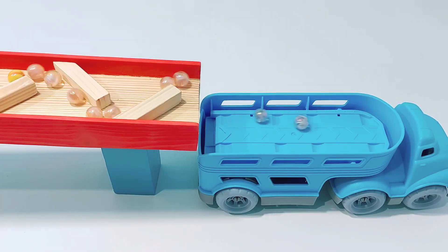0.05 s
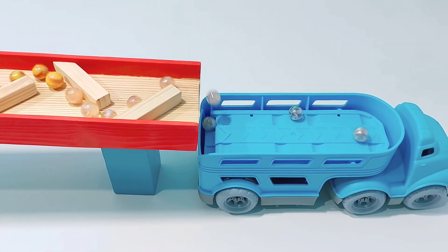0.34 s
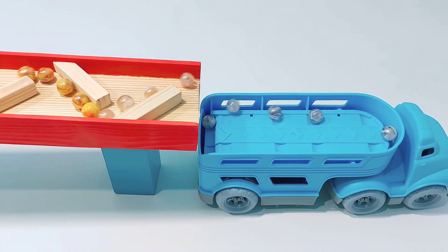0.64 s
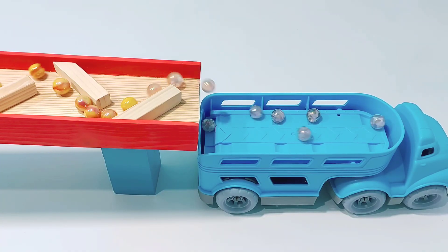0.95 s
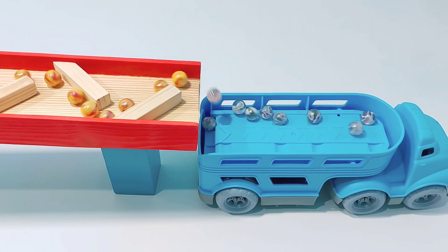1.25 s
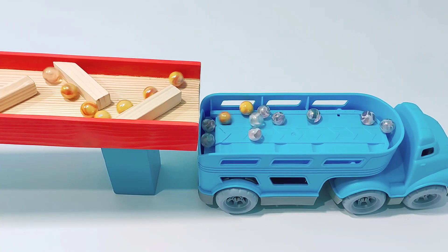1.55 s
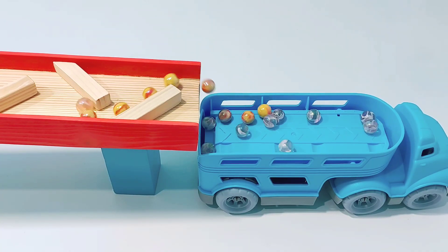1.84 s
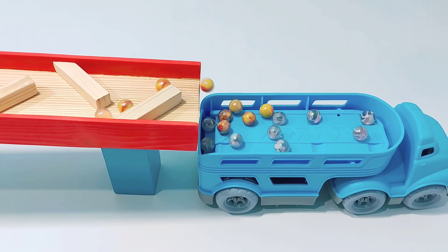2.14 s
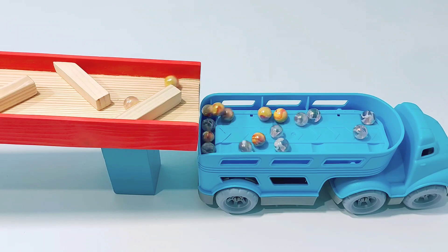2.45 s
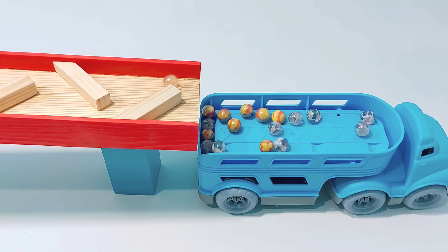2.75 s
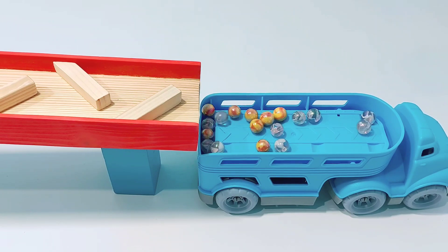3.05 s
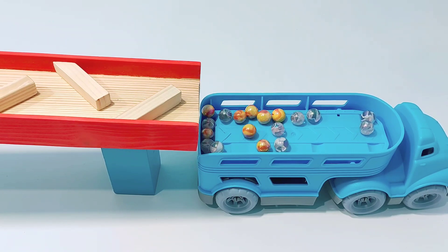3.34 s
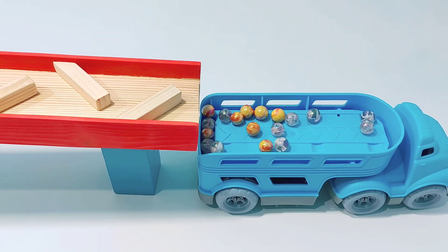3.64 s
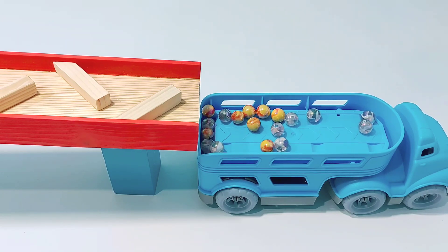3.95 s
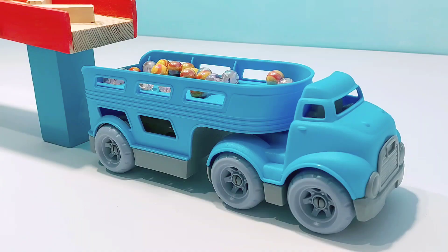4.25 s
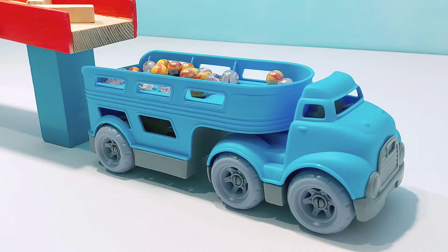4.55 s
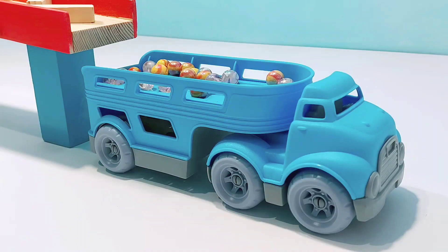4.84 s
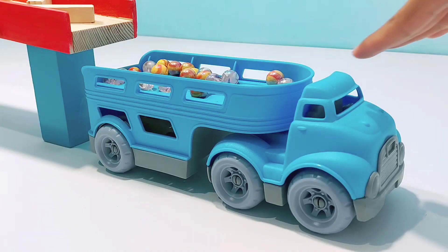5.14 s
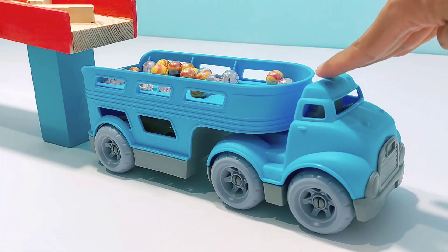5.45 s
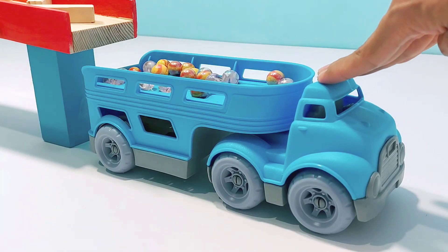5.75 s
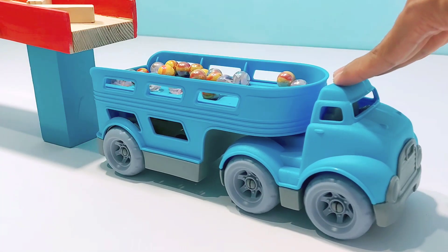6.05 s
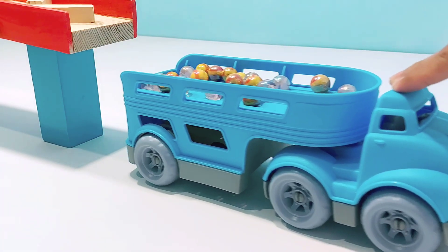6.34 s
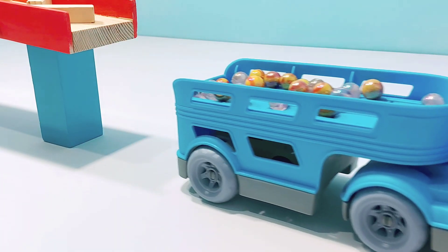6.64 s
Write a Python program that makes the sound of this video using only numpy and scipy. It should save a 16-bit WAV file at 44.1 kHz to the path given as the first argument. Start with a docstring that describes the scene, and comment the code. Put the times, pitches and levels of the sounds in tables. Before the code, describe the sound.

Glass marbles roll down a wooden track, knocking against its blocks and dropping one by one into the bed of a plastic toy truck, where they bounce, click together and settle. A lull follows with a faint, deep rumble. Then the truck is pushed across the table, its hollow shell drumming and the marbles rattling inside. The microphone is close, in a small, live room with faint hiss.

```python
"""A small, live room, with a stereo microphone close to the toys on a table. Glass marbles roll down a
wooden track, knock against its blocks and drop one by one into the bed of a plastic toy truck, a little
to the right, where they bounce, click together and settle. After a lull with a low rumble, the truck is
pushed over the table: its hollow shell drums and the load rattles. Room tone and faint hiss lie behind."""
import sys
import numpy as np
from scipy import signal
from scipy.fft import rfft, irfft, next_fast_len
from scipy.io import wavfile
from scipy.ndimage import uniform_filter1d

SR = 44100
rng = np.random.default_rng(int(sys.argv[2]) if len(sys.argv) > 2 else 0)


def wav_out(sig):
    """Save sig, one row per channel (or a flat mono array), as 16-bit PCM at SR to the path in sys.argv[1]."""
    wavfile.write(sys.argv[1], SR, np.round(np.clip(np.atleast_2d(sig).T, -1, 1) * 32767).astype(np.int16))


N = 304731
TIME = np.arange(N) / SR
BLOW_TIME = TIME[:8192]

# spectra of the background and the room's reflections: (frequency [Hz], relative level [dB])
ROOM_TONE_COLOUR = [(12, -52), (20, -24), (55, 7), (119, 3), (354, -7), (401, -1.5), (505, -13.5),
                    (768, -15), (927, -20.5), (3000, -44.5), (3900, -75), (6600, -120)]
HISS_COLOUR = [(530, -33.5), (900, -3.5), (1930, -4), (3140, -8.5), (4440, -7.5), (5840, -11.5),
               (9740, -6.5), (15500, -11)]
RUMBLE_COLOUR = [(12, -52), (20, -34), (30, -20), (38, -2), (49, -7.5), (64, 4), (129, -5.5), (151, -11.5),
                 (236, -10.5), (429, -38.5), (670, -39.5), (1200, -44), (1560, -76), (2640, -120)]
ROOM_COLOUR = [(100, 0.5), (250, -0.5), (430, -1), (800, -0.5), (2500, -0.5), (5000, -1), (11000, 3),
               (15000, -2)]
WHITE = [(20, 0), (20000, 0)]
# reverberation of the room: (frequency [Hz], time to fall 60 dB [s])
ROOM_T60 = [(100, 1), (300, 0.75), (1500, 0.4), (4500, 0.32), (12000, 0.22)]
# likeness of the microphone's two channels: (frequency [Hz], correlation [0-1])
LIKENESS = [(60, .975), (250, .955), (500, .92), (1000, .25), (2000, .4), (4000, .17), (9000, 0)]

# spectra of the rolling sounds and the blows: (frequency [Hz], relative level [dB])
TRUCK_COLOUR = [(35, -53), (60, -30), (90, -20), (180, -7), (290, 0), (500, -21.5), (850, -4.5),
                (1400, -14), (2200, -19), (3000, -27), (4400, -23), (6000, -38.5), (11500, -31),
                (15000, -44)]
JOLT_COLOUR = [(50, -11), (130, -27.5), (270, 0), (380, -14.5), (550, -53), (2000, -56)]
ROLL_COLOUR = [(24, -46.5), (40, -4.5), (298, 3), (392, 5.5), (514, -9), (1230, 0.5), (1390, -2.5),
               (1490, -1), (1650, -13), (2450, -1.5), (2990, -9.5), (4130, -16.5), (5990, -33),
               (11700, -32.5), (15000, -33)]
CLICK_COLOUR = [(1000, -31), (3500, -20.5), (5000, -3.5), (6800, -0.5), (9000, -0.5), (11300, 3.5),
                (13000, -3), (15500, -15.5)]
KNOCK_COLOUR = [(100, -11.5), (250, -6.5), (600, 2.5), (1300, 3.5), (2300, -3), (4300, -7), (5500, -14),
                (15000, -22)]
DROP_COLOUR = [(41, -54.5), (70, -30), (237, 0.5), (489, -11), (599, -5), (734, -19), (941, -16.5),
               (1230, -9), (1900, -7.5), (2430, -9), (3410, -13), (4280, -16), (6280, -19), (11300, -12.5),
               (15500, -23.5)]
SNAP_COLOUR = [(500, -5), (1500, -0.5), (2500, -16), (4300, 2), (5500, -12.5), (8000, -18), (11500, -4),
               (15500, -8.5)]
# resonances of the moving truck: (frequency [Hz], width [Hz], lift [dB])
TRUCK_PEAKS = [(135, 21, 17), (197, 37, 10), (285, 58, 3), (345, 74, -5.5), (1160, 70, -1.5),
               (1368, 94, 10.5), (1900, 69, 6)]
# resonances of track and bed under a rolling marble: (frequency [Hz], width [Hz], lift [dB])
ROLL_PEAKS = [(125, 31.1, 9), (210, 15, 12), (275, 23, 12), (350, 54, 4.5), (420.5, 23, 3), (587, 30, -5),
              (789.4, 61, 9.5), (1051, 50, 0), (1230, 44, 2), (1565, 52, 10), (2100, 65, 4.5),
              (2332, 130, -4)]
# modes of the wooden track and of the loaded truck bed: (frequency [Hz], relative level [dB])
WOOD_MODES = [(350, -7.5), (790, -7), (1075, -4.5), (1295, -5.5), (1500, 4), (1740, -3), (2030, -0.5),
              (2280, -1.5), (2440, -8), (3300, -12.5), (3700, -17.5)]
BED_MODES = [(130, -4), (222, 0.5), (280, -2), (408, -1.5), (552, -9.5), (587, -7), (625, -6.5),
             (785, -6.5), (1258, 2.5), (1400, -9.5), (1460, 2), (1555, 0), (1780, -17), (2205, 1.5),
             (2420, -0.5), (2550, -1), (2820, 0), (3510, -11), (4010, 0.5), (4190, -3), (4410, -6),
             (5040, -9.5)]

# swells of deep rumble while the truck stands: (time [s], length [s], level [dB])
SWELLS = [(4.323, 0.47, -39), (4.951, .39, -37.5), (5.375, 0.4, -42)]
# the truck's shell jolted on its wheels: (time [s], relative level [dB])
JOLTS = [(6.223, -9), (6.472, -4.5), (6.509, -7.5), (6.575, -6.5), (6.652, 1), (6.698, -4.5), (6.744, -6.5),
         (6.881, -10.5)]
# marbles striking the wooden blocks: (time [s], relative level [dB])
BLOCK_HITS = [(0.211, -14), (0.371, -15), (0.413, -7.5), (0.577, -11), (0.81, -13), (0.85, -7.5),
              (1.014, -12), (1.596, -13), (1.761, -18), (1.897, -13.5), (2.786, -35)]
# one marble running into another: (time [s], relative level [dB])
CLICKS = [(0.398, -20), (0.5353, -21), (0.6266, -24), (0.795, -19.5), (0.8738, -16), (1.011, -16),
          (1.026, -20), (1.4105, -18), (1.616, -17.5), (2.208, -20.5), (2.241, -18), (2.4262, -12.5),
          (2.512, -24.5), (2.7043, -27), (3.016, -19), (3.077, -24.5), (3.1062, -29), (3.1476, -27.5),
          (3.29, -33.5), (3.4988, -43), (3.6498, -52), (5.9547, -35), (6.074, -36.5), (6.2619, -18.5),
          (6.3205, -17.5), (6.4162, -29), (6.621, -15), (6.6548, -19), (6.833, -29.5)]
# bumps on the truck's floor and walls:
# (time [s], relative level [dB], spot resonance [Hz], hardness as lift above 2.5 kHz [dB])
KNOCKS = [(0.001, -2, 2580, 2.5), (0.489, -7.5, 1100, -6), (2.032, -7, 1250, 8), (2.246, -10.5, 2560, 3),
          (2.268, -16, 2770, 11), (2.425, -11, 1430, 8.5), (2.684, -15.5, 800, -8), (2.977, -8, 2550, 4),
          (3.21, -51, 1410, 7), (3.29, -32.5, 932, -11), (3.4, -27, 1140, -7), (3.435, -34, 1180, -0.5),
          (3.498, -42, 1140, 2.5), (3.551, -45, 1114, -15), (3.718, -45.5, 1194, -20),
          (5.609, -48, 914, -19.5), (5.932, -46.5, 1183, -20), (6.155, -32.5, 1330, -33),
          (6.206, -30, 1300, -20), (6.221, -9.5, 1370, -8.5), (6.32, -18, 1320, -5), (6.45, -15, 795, -6),
          (6.477, -11.5, 790, -31), (6.605, -20, 1600, -18), (6.62, -9, 1120, -14), (6.652, -7, 1410, -13),
          (6.714, -14, 1160, -32), (6.857, -19, 1360, 1)]
# marbles landing in the bed, levels relative within each column: (time [s], clack [dB], snap [dB],
# spot resonance [Hz], first flight [s], rebound knock [dB], rebound click [dB])
DROPS = [(0.108, -10, -6, 4200, 0.084, -15, -17.5), (0.271, -11.5, 1, 1540, 0.053, -9, -24),
         (0.5, -12, -26, 2600, 0.062, -7, -18), (0.695, -11, -14.5, 1230, 0.074, -15, -29),
         (0.898, -11, -7, 1520, 0.065, -8.5, -25.5), (1.069, -13.5, -24.5, 3980, 0.054, -5.5, -13),
         (1.175, -10, 1.5, 1520, 0.065, -15, -16.5), (1.33, -9.5, -25, 1250, 0.083, -9, -14.5),
         (1.43, -12, -4.5, 1404, 0.078, -8, -20.5), (1.655, -10, -0.5, 2420, 0.072, -4, -17),
         (1.782, -14.5, 2.5, 2280, .045, -17.5, -14.5), (1.955, -19, -2, 2710, 0.05, -8, -9.5),
         (2.087, -16.5, 3, 2320, 0.034, -7.5, -19), (2.32, -13, 2, 2440, 0.059, -13, -20.5),
         (2.574, -11, -6.5, 1250, 0.058, -9, -17.5), (2.886, -15, -20, 1195, 0.057, -8, -15.5)]


def undb(db):
    """Decibels to gain."""
    return 10 ** (np.asarray(db) / 20)


def rms(x):
    """Root mean square."""
    return np.sqrt(np.mean(x ** 2)) + 1e-12


def along(points, hz):
    """Read (Hz, value) points on a log-frequency axis."""
    f, value = np.transpose(points)
    return np.interp(np.log(hz + 1), np.log(f), value)


def lift_db(hz, peaks):
    """Sum of resonance humps."""
    return sum(db / (1 + (2 * (hz - f) / width) ** 2) for f, width, db in peaks)


def shaped(x, response):
    """Filter by a gain given as a function of frequency."""
    n = x.shape[-1]
    size = next_fast_len(n)
    return irfft(rfft(x, size) * response(np.fft.rfftfreq(size, 1 / SR)), size)[..., :n]


def split(x, hz):
    """The parts below and above a frequency."""
    return [signal.sosfilt(signal.butter(4, hz, kind, fs=SR, output="sos"), x)
            for kind in ("low", "high")]


def fade(t, t60_s):
    """Exponential decay."""
    return np.exp(-np.log(1000) * t / t60_s)


def ramp(start_s, length_s):
    """An even rise from 0 to 1."""
    return np.clip((TIME - start_s) / length_s, 0, 1)


def release(start_s, db_per_s):
    """Full gain until a given time, then a steady fall."""
    return undb(-db_per_s * np.maximum(TIME - start_s, 0))


def panned(x, pan_db):
    """Tip a stereo sound to the left (positive) or right (negative)."""
    return x * undb(np.array([[pan_db], [-pan_db]]) / 2)


def add(out, s, x):
    """Mix a sound in at a given time."""
    i = int(np.clip(s * SR, 0, N - 1))
    out[:, i:i + x.shape[1]] += x[:, :N - i]


def attack_level(x, db):
    """Set the level of the first 20 ms of a blow."""
    return x * undb(db) / rms(x[:, :SR // 50])


def noise(colour, n, peaks=()):
    """Coloured stereo noise, lifted at resonances; the bass is alike in both channels."""
    hz = np.fft.rfftfreq(next_fast_len(n, True), 1 / SR)
    gain = undb(along(colour, hz) + lift_db(hz, peaks))
    alike = along(LIKENESS, hz)
    white = rfft(rng.standard_normal((2, 2 * len(hz) - 2)))
    mid, side = irfft(white * gain * np.sqrt([1 + alike, 1 - alike]))[:, :n]
    x = np.array([mid + side, mid - side])
    return x / rms(x)


def blow(colour, crack_s, ring_s, ring_db, peaks=()):
    """Countless close modes struck at once: a crack and a weaker ring; small parts give no deep bass."""
    envelope = fade(BLOW_TIME, crack_s) + undb(ring_db) * fade(BLOW_TIME, ring_s)
    return split(noise(colour, len(BLOW_TIME), peaks) * envelope, 72.4)[1]


def ring(modes, scatter_db):
    """A body's strong modes; each spot weights them anew, and the high ones differ in stereo phase."""
    hz, db = np.transpose(modes)[:, :, None]
    weight, detune, phase = rng.standard_normal((3, len(modes), 1))
    sign = rng.choice([-1, 1], (len(modes), 1))
    t60_s = .26 / (1 + hz / 1800)  # losses grow with frequency
    tuned_hz = hz * (1 + .007 * detune)  # the shifting load detunes the modes
    envelope = undb(db + scatter_db * weight) * fade(BLOW_TIME, t60_s)
    wave = sign * np.exp(2j * np.pi * tuned_hz * BLOW_TIME) * envelope
    turn = np.exp(1j * phase * np.minimum(hz / 1100, 1) ** 2)
    stereo = np.array([(wave * turn).sum(0).imag, (wave / turn).sum(0).imag])
    return split(stereo, 97)[1]


def grains(colour, peaks, per_s, spread_db, ring_s, spots=4):
    """Tiny random impacts at several spots of a ringing body."""
    out = 0
    for _ in range(spots):
        chance, size = rng.random(N), rng.standard_normal(N)
        hits = (chance < per_s / spots / SR) * undb(spread_db * np.clip(size, -2, 2))
        spot = noise(WHITE, len(BLOW_TIME)) * fade(BLOW_TIME, ring_s)
        out = out + signal.oaconvolve(hits[None], spot, axes=1)[:, :N]
    return shaped(out, lambda hz: undb(along(colour, hz) + lift_db(hz, peaks)))


def with_speed(full_db, db_per_decade):
    """Gain that grows as the pushed truck evenly gathers speed, by so many dB per tenfold speed."""
    speed = ramp(start_s=5.807, length_s=.7)
    return undb(full_db) * speed ** (db_per_decade / 20)


def on_track():
    """Gain of the stream of marbles on the track: steady, then it runs out."""
    return release(start_s=2.425, db_per_s=66)


def in_bed(db_per_s, growth=0, delay_s=0):
    """Gain of marbles moving in the bed: each adds energy, as fill ** growth, that drains away."""
    starts_s = np.array([0] + [row[0] + delay_s for row in DROPS])  # some roll from the start
    fill = np.linspace(0, 1, len(starts_s))
    landings = np.zeros(N)
    landings[(starts_s * SR).astype(int)] = fill ** growth
    energy = signal.lfilter([1], [1, -undb(-2 * db_per_s / SR)], landings)
    return np.sqrt(energy)


def air():
    """Low room tone and a faint hiss; both step up during the lull and stay up."""
    hiss_db = -78.5 + 12 * ramp(start_s=4.06, length_s=.12)
    low_gain = np.hypot(undb(-63), undb(-57) * ramp(start_s=4.33, length_s=.065))
    return noise(ROOM_TONE_COLOUR, N) * low_gain + noise(HISS_COLOUR, N) * undb(hiss_db)


def rumble():
    """A deep rumble comes and goes, and grows with speed once the truck rolls."""
    swells = [undb(db) * ramp(s, length_s=.09) * release(s + length_s, db_per_s=105)
              for s, length_s, db in SWELLS]
    wheels = with_speed(full_db=-27, db_per_decade=22.5)
    deep = noise(RUMBLE_COLOUR, N, peaks=[(57.1, 3.9, 17.2), (83.6, 8, 8)])
    deep /= np.sqrt(uniform_filter1d(np.mean(deep ** 2, axis=0), size=9000))  # even out the level
    return panned(deep, 1) * np.linalg.norm(swells + [wheels], axis=0)


def room(x, wet_db):
    """Reflections reach the microphone within milliseconds and lose their treble first."""
    t = TIME[:SR]
    rest, tail = noise(ROOM_COLOUR, SR), 0
    for octave_hz in 200 * 2. ** np.arange(7):
        band = shaped(rest, lambda hz: hz < octave_hz * np.sqrt(2))
        rest = rest - band
        tail = tail + band * fade(t, along(ROOM_T60, octave_hz))
    tail *= np.clip((t - .004) / .0032, 0, 1)
    tail /= np.sqrt(np.sum(tail ** 2) / 2)
    return undb(wet_db) * signal.oaconvolve(x, tail, axes=1)[:, :N]


def squeak(start_s, end_s, hz, db):
    """A faint squeak as a finger takes grip on the cab roof."""
    swell = np.sin(np.pi * ramp(start_s, end_s - start_s))
    rub = shaped(noise(WHITE, N), lambda f: 1 / (1 + ((f - hz) / 220) ** 4))
    return rub / rms(rub) * swell * undb(db)


def rolling():
    """Marbles patter over wood grain, then slow down in the ribbed bed; the hollow parts drone beneath."""
    patter = grains(ROLL_COLOUR, ROLL_PEAKS, per_s=530, spread_db=7.5, ring_s=.054)
    drone, grain = split(patter, 650)
    drone_gain = np.hypot(undb(-36) * on_track(), undb(-39) * in_bed(db_per_s=38.5))
    grain_gain = undb(-32.5) * np.hypot(on_track(), in_bed(db_per_s=54.5))
    return panned(drone / rms(drone) * drone_gain + grain / rms(grain) * grain_gain, .6)


def jostling():
    """Marbles tick together on the track; each landing rattles the pile, more so as the bed fills."""
    ticks = grains(CLICK_COLOUR, [], per_s=45, spread_db=4, ring_s=.012, spots=2)
    rattle = grains(CLICK_COLOUR, [], per_s=450, spread_db=4, ring_s=.012, spots=2)
    track = ticks / rms(ticks) * undb(-53.5) * on_track()
    pile = rattle / rms(rattle) * undb(-30) * in_bed(db_per_s=210, growth=1.1, delay_s=.0072)
    return panned(track + pile, -2)


def truck():
    """Hard wheels drum the hollow shell, bumps jolt it, and the marbles chatter on the bed."""
    shell, _ = split(grains(TRUCK_COLOUR, TRUCK_PEAKS, per_s=400, spread_db=2, ring_s=.055), 476)
    _, load = split(grains(TRUCK_COLOUR, TRUCK_PEAKS, per_s=260, spread_db=3, ring_s=.08), 495)
    out = shell / rms(shell) * with_speed(full_db=-20, db_per_decade=45.5)
    out += load / rms(load) * with_speed(full_db=-33, db_per_decade=50)
    for s, db in JOLTS:
        jolt = blow(JOLT_COLOUR, crack_s=.06, ring_s=.22, ring_db=-6)
        thump, _ = split(jolt, 455)  # keep the jolt a dull, low thump with no click
        add(out, s, attack_level(thump, db - 13.5))
    return panned(out, -2.6)


def blocks():
    """Marbles glance along the blocks, so each contact builds up briefly; the track answers with a tock."""
    out = np.zeros((2, N))
    build_up = np.clip(BLOW_TIME / .009, 0, 1)
    for s, db in BLOCK_HITS:
        contact = blow(KNOCK_COLOUR, crack_s=.077, ring_s=.063, ring_db=-11.5)
        tock = attack_level(ring(WOOD_MODES, scatter_db=1.5), -1.5) + attack_level(contact, -.6)
        add(out, s - .002, panned(attack_level(tock * build_up, db - 13), -1))
    return out


def click(db):
    """Glass meets glass in a very short, bright contact, each with its own treble colour."""
    peaks = [(hz, 1800, 3) for hz in rng.uniform(7000, 14000, 3)]
    glass = blow(CLICK_COLOUR, crack_s=.008, ring_s=.08, ring_db=-9, peaks=peaks)
    return panned(attack_level(glass, db - 13.5), -1.5 + 2 * rng.standard_normal())


def clicks():
    """Marbles run into each other."""
    out = np.zeros((2, N))
    for s, db in CLICKS:
        add(out, s, click(db))
    return out


def knock(db, spot_hz, hard_db):
    """A bump on the plastic; each spot has its own resonance, and a harder contact is brighter."""
    panel = blow(KNOCK_COLOUR, crack_s=.04, ring_s=.17, ring_db=-6, peaks=[(spot_hz, 140, 12)])
    bed = ring(BED_MODES, scatter_db=-3.5)
    dull, bright = split(attack_level(panel, 0) + attack_level(bed, -10.5), 2500)
    return panned(attack_level(dull + undb(hard_db) * bright, db - 13.5), -1.1)


def knocks():
    """Single bumps on the truck's floor and walls."""
    out = np.zeros((2, N))
    for s, db, spot_hz, hard_db in KNOCKS:
        add(out, s, knock(db, spot_hz, hard_db))
    return out


def rebounds(bounces=4, restitution=.86, knock_loss_db=9, click_loss_db=15):
    """A landed marble hops on unevenly, lower and faster, and clicks against its neighbours."""
    out = np.zeros((2, N))
    for s, _, _, spot_hz, flight_s, knock_db, click_db in DROPS:
        new_spot_hz = spot_hz * np.exp(.22 * rng.standard_normal())
        plastic = knock(knock_db, new_spot_hz, hard_db=4.5)
        for k in range(bounces):
            uneven, glance = rng.standard_normal(2) * min(k, 1)  # scatter from the second hop on
            s += flight_s * restitution ** k * (1 + .12 * uneven)
            glass = click(click_db - click_loss_db * k + 3.5 * glance)
            add(out, s, plastic * undb(-knock_loss_db * k) + glass)
    return out


def drops():
    """Each marble hits the plastic bed with a snap, a thud, a clack and a tick."""
    out = np.zeros((2, N))
    mean_clack_db = np.mean([row[1] for row in DROPS])
    wall_peak = (4150, 700, 4)
    for s, clack_db, snap_db, spot_hz, *_ in DROPS:
        panel = blow(DROP_COLOUR, crack_s=.045, ring_s=.15, ring_db=-8,
                     peaks=[(spot_hz, 220, 8), wall_peak])
        bed = ring(BED_MODES, scatter_db=2)
        thud, rest = split(attack_level(panel, 0) + attack_level(bed, -5), 700)
        clack, tick = split(rest, 5000)
        # all fall from one height, so thud and tick hardly vary
        thud_db = -22 + .29 * (clack_db - mean_clack_db)
        hit = attack_level(thud, thud_db) + attack_level(clack, clack_db - 2.5) + attack_level(tick, -22)
        # the first milliseconds of contact are bright and die at once
        snap = noise(SNAP_COLOUR, len(BLOW_TIME)) * fade(BLOW_TIME, t60_s=.028)
        add(out, s + .0005, panned(hit + snap * undb(snap_db - 9), -2))
    return out


def scene():
    """Close blows and rolling sounds, with the room's reflections and the background behind them."""
    blows = drops() + rebounds() + clicks() + jostling() + knocks() + blocks()
    finger = squeak(start_s=5.77, end_s=5.96, hz=5080, db=-74)
    rolls = rolling() + truck() + finger
    return blows + room(blows, wet_db=-6.5) + rolls + room(rolls, wet_db=-11.5) + rumble() + air()


def record(dry):
    """The microphone drops the deepest bass; the hardest hits are rounded off and the top is cut."""
    low_cut_hz, top_hz, ceiling = 42, 15600, .92
    _, heard = split(dry, low_cut_hz)
    rounded = heard / (1 + (heard / ceiling) ** 8) ** (1 / 8)
    return signal.sosfilt(signal.ellip(8, .2, 70, top_hz, fs=SR, output="sos"), rounded)


dry = scene()
out = record(dry)
wav_out(out)
```